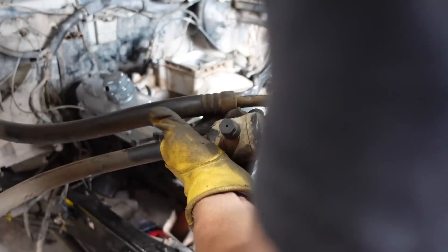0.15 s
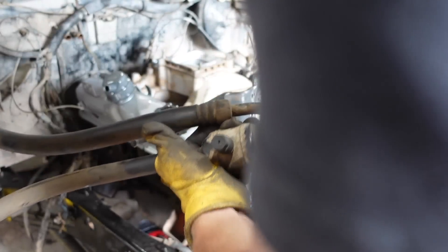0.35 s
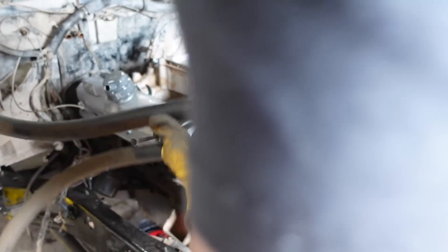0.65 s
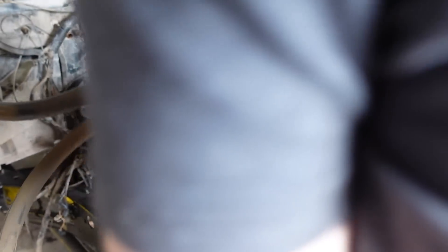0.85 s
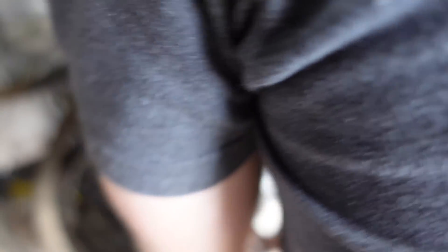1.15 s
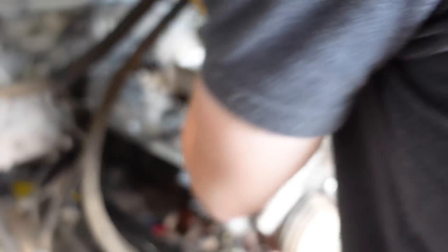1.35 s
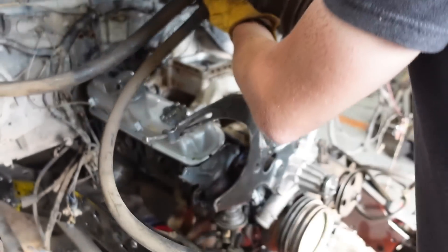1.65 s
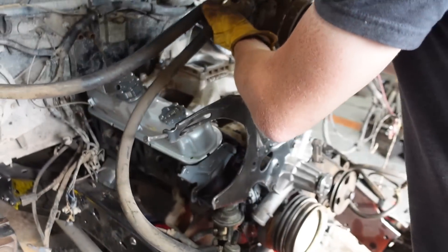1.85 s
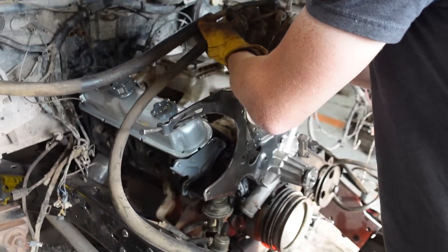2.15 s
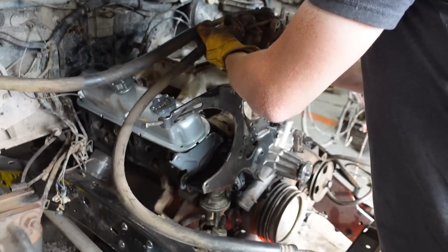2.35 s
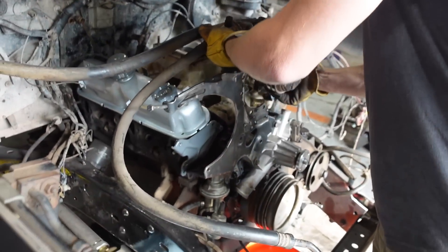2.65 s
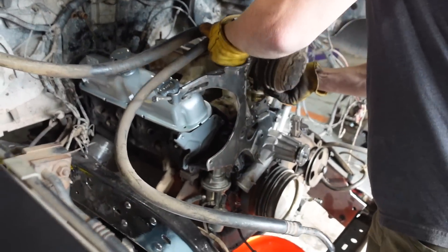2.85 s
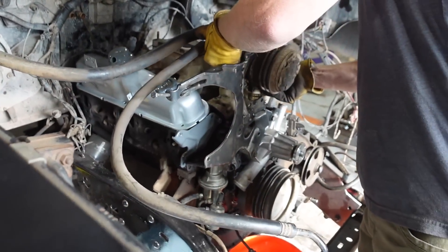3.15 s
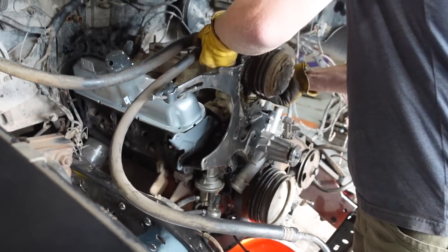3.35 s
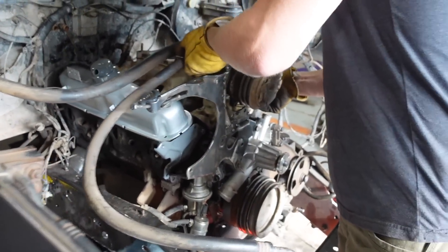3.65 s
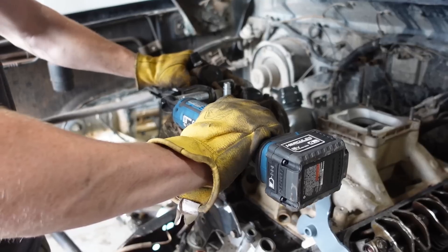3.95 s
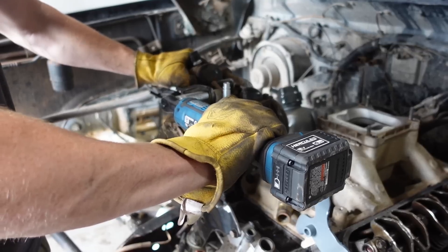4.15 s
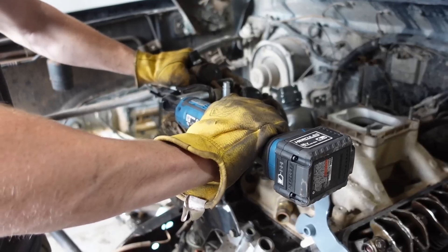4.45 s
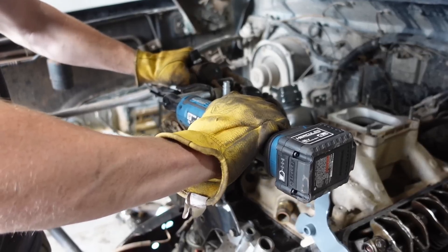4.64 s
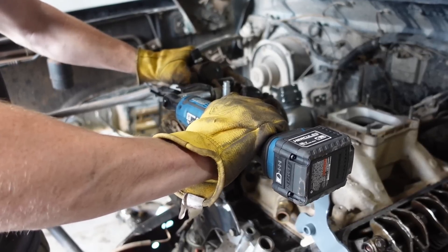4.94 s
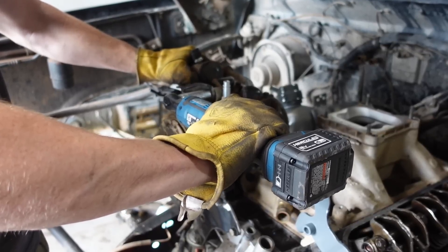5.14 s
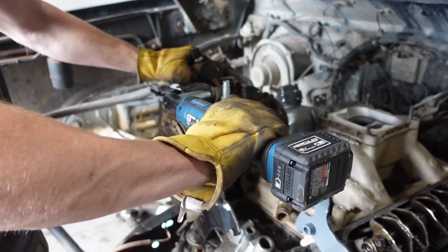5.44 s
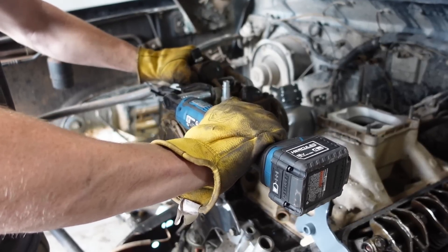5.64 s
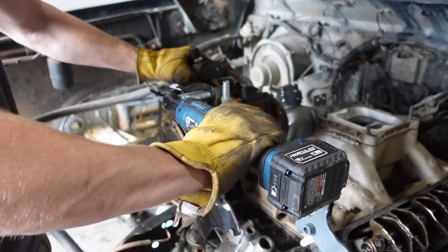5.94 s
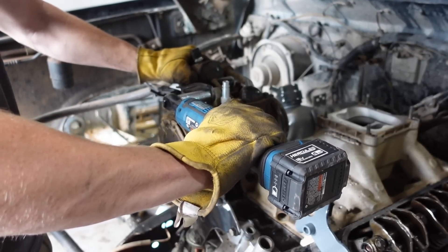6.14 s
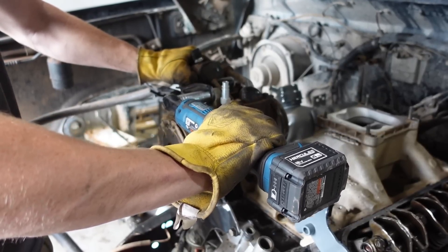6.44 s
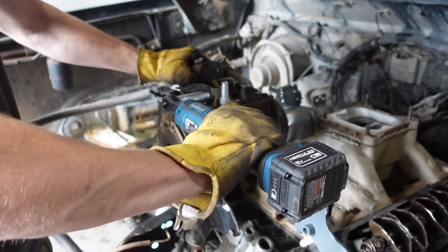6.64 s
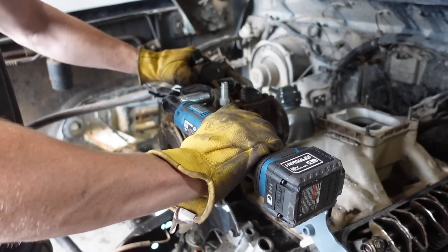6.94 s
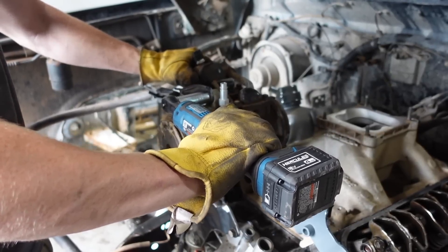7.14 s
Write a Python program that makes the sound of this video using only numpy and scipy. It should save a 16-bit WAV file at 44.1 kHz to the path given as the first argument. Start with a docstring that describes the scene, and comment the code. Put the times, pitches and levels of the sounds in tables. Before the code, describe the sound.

In a workshop, heard close, steel slides briefly and a hollow part knocks over a low rumble. Gloves and sleeves rustle, small metal pieces clink, then a heavy part bangs home and chatters. After quieter handling, a cordless ratchet blips, whines and runs a bolt in with rapid clattering clicks, harder in uneven grips, ending with a short squeak as the bolt seats.

```python
"""A low rumble, a sliding steel part and rustling gloves open work on an engine in a workshop.
Parts knock, bump, clink and squeak as decaying or friction-driven resonances; one bangs home and chatters.
A cordless ratchet is blipped, then runs a bolt in: each swing of its yoke gives a knock and three pawl clicks.
When the bolt grips, knocks harden and clacks ring the socket; the bolt squeaks as it seats.
The speed controller whines as a two-harmonic tone, and diffuse reflections give the room's answer."""
import sys
import numpy as np
from scipy import signal
from scipy.fft import rfft, irfft
from scipy.io import wavfile
from scipy.ndimage import uniform_filter1d, map_coordinates

SR = 44100
rng = np.random.default_rng(int(sys.argv[2]) if len(sys.argv) > 2 else 0)


def master(y):
    """Save y as 16-bit WAV."""
    cut = np.clip(np.atleast_2d(y).T, -1, 1)
    pcm = np.round(cut * 32767)  # scale
    wavfile.write(sys.argv[1], SR, pcm.astype(np.int16))


N = 321474
TIME = np.arange(N) / SR


def amp(db):
    """Decibel law: level to amplitude ratio."""
    return 10 ** (np.asarray(db) / 20)


def unit(x):
    """Normalisation of x to rms 1."""
    return x / np.sqrt(np.mean(x ** 2) + 1e-20)


def along(points, hz):
    """Interpolation of (f/Hz, value) points on a logarithmic frequency axis."""
    f, v = np.transpose(points)
    return np.interp(np.log(hz + 1), np.log(f + 1), v)


def curves(rows, at=TIME):
    """Linear interpolation in time of each column of a curve table."""
    s, *columns = np.transpose(rows)
    return [np.interp(at, s, column) for column in columns]


def fade(t60, t=TIME[:SR]):
    """Exponential decay: the amplitude falls by 60 dB in t60 seconds."""
    return np.exp(-np.log(1000) * t / t60)


def swell(s, half):
    """Gaussian rise and fall round time s."""
    return np.exp(-np.minimum(((TIME - s) / half) ** 2, 20))


def add(track, s, sound):
    """Superposition of a sound on the track from time s."""
    part = track[max(round(s * SR), 0):][:len(sound)]
    part += sound[:len(part)]


def convolve(x, response):
    """Linear filtering: x convolved with an impulse response."""
    return signal.oaconvolve(x.astype(np.float32), response.astype(np.float32))[:len(x)].astype(float)


def colour(x, spectrum, size=8192):
    """Minimum-phase filtering to a spectral shape; white noise keeps its power."""
    shape = amp(along(spectrum, np.fft.rfftfreq(size, 1 / SR)))
    cepstrum = irfft(np.log(shape + 1e-6))
    # folding the cepstrum forward makes the response causal
    cepstrum[1:size // 2] *= 2
    cepstrum[size // 2 + 1:] = 0
    response = irfft(np.exp(rfft(cepstrum)))
    return convolve(x, response / np.linalg.norm(response))


def highpass(x, hz):
    """Second-order high-pass filtering: weak radiation at low frequencies."""
    return signal.lfilter(*signal.butter(2, hz, "highpass", fs=SR), x)


def resonate(x, modes):
    """Modal superposition: x through parallel (f/Hz, width/Hz, level/dB) resonances."""
    return sum(amp(db) * signal.lfilter(*signal.iirpeak(hz, hz / width, SR), x) for hz, width, db in modes)


def noise(spectrum):
    """Broadband random excitation, coloured and brought to rms 1."""
    return unit(colour(rng.standard_normal(N), spectrum))


def wobble(rate):
    """Smooth random modulation: spline through rate random knots a second."""
    knots = rng.standard_normal(int(N * rate / SR) + 4)
    steps = np.arange(len(knots) * 10) / 10
    return np.interp(TIME * rate, steps, map_coordinates(knots, [steps]))


SPIKE = 2.05  # the first touch of a contact, against the micro-impacts that follow it


def contacts(times, levels_db, t60, alike, size=2048):
    """Impact excitation: a sharp touch, then decaying micro-impacts correlated from one contact to the next."""
    burst, decay, track = rng.standard_normal(size), fade(t60)[:size], np.zeros(N)
    for s, db in zip(times, levels_db):
        fresh = rng.standard_normal(size)
        burst = alike * burst + np.sqrt(1 - alike ** 2) * fresh
        add(track, s, amp(db) * np.append(SPIKE, burst * decay))
    return track


def echo(x, decays):
    """Diffuse reverberation: each frequency of a noise tail dies at its own rate."""
    hz, t, z = signal.stft(rng.standard_normal(SR), SR, nperseg=128)
    decay = np.exp(-np.log(1000) * t / along(decays, hz)[:, None])
    tail = signal.istft(z * decay, SR, nperseg=128)[1]
    return convolve(x, np.pad(tail, (60, 0)) / np.linalg.norm(tail))


# course of the low rumble: t/s, level/dB
RUMBLE_LEVEL = [(0, -39), (.2, -27), (.62, -22.5), (1.55, -33), (2.85, -30.5), (3.9, -36), (4.2, -43),
                (7.29, -62)]
# spectral density of the rumble: f/Hz, relative level/dB per Hz
RUMBLE_COLOUR = [(8, -11.5), (18, 6), (34, -3), (52, -6), (81, -26), (160, -30), (400, -63)]
# spectral density of the workshop air: f/Hz, relative level/dB per Hz
AIR_COLOUR = [(150, -4), (500, -27), (2000, -33), (8000, -19), (16000, -40)]


def background():
    """Stationary noise: a low rumble of changing level over the steady air of the workshop."""
    return amp(curves(RUMBLE_LEVEL)[0]) * noise(RUMBLE_COLOUR) + amp(-74) * noise(AIR_COLOUR)


# a steel part slides: t/s, level/dB
SLIDE_LEVEL = [(0, -38), (.03, -33.5), (.11, -42), (.15, -47), (.29, -42), (.33, -62), (.4, -100)]
# resonances of the sliding part: f/Hz, width/Hz, relative level/dB
SLIDING_STEEL = [(667, 140, 4), (1680, 150, 5.5), (2100, 46, 0), (3340, 370, -5.5), (3720, 100, -9)]
# parts squeak when pushed, the bolt as it seats: middle t/s, half length/s, level/dB, f/Hz, width/Hz
SQUEAKS = [(0.631, 0.023, -39, 1210, 220), (2.996, 0.045, -41.5, 2060, 900), (3.515, 0.11, -54, 2250, 250),
           (6.996, .009, -22, 1770, 260), (7.024, .01, -20.5, 1550, 260)]


def scrape():
    """Friction excitation: uneven rubbing keeps sliding steel ringing and narrow squeaks sounding."""
    friction = rng.standard_normal(N) * amp(1.8 * wobble(150))
    track = amp(curves(SLIDE_LEVEL)[0]) * unit(resonate(friction, SLIDING_STEEL))
    for s, half, db, hz, width in SQUEAKS:
        track += amp(db) * swell(s, half) * unit(resonate(friction, [(hz, width, 0)]))
    return track


# faint rustle between rubs: t/s, relative glove scuff level/dB, relative sleeve level/dB
STIR = [(0, -39.5, -43), (.4, -44, -57), (1.65, -50.5, -56), (2.3, -59, -68.5), (2.65, -52.5, -53),
        (3.12, -50.5, -55.5), (3.32, -53.5, -64.5), (3.45, -49, -55.5), (3.95, -43, -65)]
# rubs: middle t/s, half length/s, relative glove scuff level/dB, relative sleeve level/dB, resonance f/Hz
RUBS = [(0.452, 0.04, -38.5, -48.5, 2700), (0.61, 0.028, -39, -45.5, 8000),
        (0.864, 0.018, -42, -52.5, 1150), (0.997, 0.079, -38.5, -46, 2600),
        (1.118, 0.052, -39.5, -53.5, 9000), (1.377, 0.034, -41.5, -49.5, 3000),
        (1.481, 0.036, -39, -44.5, 6700), (2.906, 0.11, -46.5, -51, 3400),
        (3.228, 0.02, -46.5, -47.5, 9000), (3.405, 0.021, -49.5, -53, 11900),
        (3.7, 0.12, -66, -52.5, 12500)]
# spectral density of glove friction: f/Hz, relative level/dB per Hz
GLOVE_COLOUR = [(100, 1), (400, -4.5), (1200, -8.5), (2400, -17.5), (6000, -52)]
# spectral density of sleeve friction: f/Hz, relative level/dB per Hz
SLEEVE_COLOUR = [(1200, -9), (2600, 0.5), (6700, -4.5), (12800, -13), (16000, -34)]
RUB_RING_DB, RUB_RING_SHARE = -5, .4  # ring level against the sleeve; its width as a share of its pitch


def rustle():
    """Granular friction noise: gloves scuff on hoses and sleeves brush by, each rub with its own resonance."""
    # powers, not amplitudes, add up
    scuff, sleeve = amp(curves(STIR)) ** 2
    friction, rings = rng.standard_normal(N), np.zeros(N)
    for s, half, scuff_db, sleeve_db, hz in RUBS:
        rub = swell(s, half)
        scuff = scuff + amp(scuff_db) ** 2 * rub
        sleeve = sleeve + amp(sleeve_db) ** 2 * rub
        ring = unit(resonate(friction, [(hz, RUB_RING_SHARE * hz, 0)]))
        rings += amp(sleeve_db + RUB_RING_DB) * np.sqrt(rub) * ring
    grain = wobble(70)
    glove_grain = amp(-0.57 + 0.95 * grain + 1.2 * wobble(300))
    sleeve_grain = amp(grain + 1.2 * wobble(500) - 2.04)
    glove = np.sqrt(scuff) * glove_grain * noise(GLOVE_COLOUR)
    return glove + sleeve_grain * (np.sqrt(sleeve) * noise(SLEEVE_COLOUR) + rings)


# modes of a hollow part that is knocked: f/Hz, relative level/dB, t60/s
HOLLOW_MODES = [(222.5, 0, 0.47), (346, -11.5, 0.16), (555, -15, 0.28), (741, -17, 0.25)]
# spectral density of a dull tap, here and under the clinks: f/Hz, relative level/dB per Hz
DULL_COLOUR = [(100, -30), (350, 5), (1500, 7), (3000, -6.5), (6000, -26)]


def hollow_knock(s=.126):
    """Modal decay: a bumped hollow part hums in damped sinusoids with a thud and a tap."""
    track, t = np.zeros(N), TIME[:SR]
    ring = sum(amp(db) * fade(t60) * np.sin(2 * np.pi * hz * t) for hz, db, t60 in HOLLOW_MODES)
    thud_colour = [(60, 3), (250, 5.0), (700, -14.0), (1400, -17.0), (4500, -52)]
    thud = colour(rng.standard_normal(SR) * fade(0.48), thud_colour)
    tap = colour(rng.standard_normal(SR) * fade(.03), DULL_COLOUR)
    add(track, s, amp(-14.0) * ring + amp(-22.0) * thud + amp(-27.5) * tap)
    return track


# soft bumps: t/s, relative level/dB, f/Hz, t60/s
BUMPS = [(0.499, -11.5, 25.7, 0.7), (1.097, -34, 390, 0.075), (1.104, -15.5, 118, 0.13),
         (1.351, -24.5, 226, 0.056), (2.865, -3.5, 27.2, 0.29), (2.882, -31.5, 342, 0.08),
         (3.509, -34, 590, 0.096), (3.773, -36, 759, 0.28)]


def bumps():
    """Heavy damping: each soft bump is a slow-onset decay of tone and noise round one pitch."""
    track, t = np.zeros(N), TIME[:SR]
    for s, db, hz, t60 in BUMPS:
        mode = [(hz, hz / 2, 0)]
        grit = unit(resonate(resonate(rng.standard_normal(SR), mode), mode))
        envelope = fade(t60) * (1 - fade(0.014))
        add(track, s, amp(db) * envelope * (np.sin(2 * np.pi * hz * t) + 0.85 * grit))
    return track


# metal touching metal: t/s, relative level/dB, dull part against the bright/dB
CLINKS = [(0.558, -35.5, -8), (0.5734, -28.5, 5.5), (1.325, -28.5, -14), (2.2013, -40.5, -22),
          (2.607, -37, -23), (2.684, -38.5, -20), (2.882, -40, 2), (3.51, -47.5, 9), (3.837, -23.5, -6),
          (3.8751, -25, 0.5), (3.884, -39.5, 15)]
# spectral density of a bright tick: f/Hz, relative level/dB per Hz
BRIGHT_COLOUR = [(400, -16), (4200, 0.5), (4700, 2.5), (5400, -5.5), (8000, -4), (16000, -33)]


def clinks(t60=0.068):
    """Impact noise: light steel contacts as decaying bursts, a bright tick over a duller knock."""
    bright, dull = np.zeros((2, N))
    for s, db, dull_db in CLINKS:
        add(bright, s, amp(db - 5.5) * fade(t60) * rng.standard_normal(SR))
        add(dull, s, amp(db + dull_db - 2.0) * fade(t60) * rng.standard_normal(SR))
    return colour(bright, BRIGHT_COLOUR) + colour(dull, DULL_COLOUR)


# spectral density of the bang's contacts: f/Hz, relative level/dB per Hz
BANG_COLOUR = [(150, 0.5), (320, -2), (750, -12.5), (1450, -2.5), (2100, -2.5), (2700, -10.5), (5800, -22),
               (8000, -23.5), (15000, -45)]
# modes of the part that bangs: f/Hz, relative level/dB
PLATE_MODES = [(300, -2.5), (355, 2), (450, -1), (1440, -2), (1750, 1), (1900, 1.5), (2090, 1.5)]
PLATE_WIDTH_HZ = 48  # how narrowly each mode rings
BANG_LOW_HZ = 250  # the falling part radiates little below this


def bang(s=1.7413, chatter_s=0.068):
    """Impact and modal response: a heavy part drops home with a push, then chatters and rings its modes."""
    track, t = np.zeros(N), TIME[:SR]
    u = t / 0.0016
    push = (1 - u) * np.exp(-u) * (1 - fade(0.0012)) ** 2
    hit = amp(-10.5) * fade(0.01)
    chatter = amp(-18.5) * np.exp(-(t / chatter_s) ** 2) * amp(wobble(400)[:SR])
    blows = colour((hit + chatter) * rng.standard_normal(SR), BANG_COLOUR)
    ring = resonate(blows, [(hz, PLATE_WIDTH_HZ, db) for hz, db in PLATE_MODES])
    add(track, s, amp(8.0) * push + blows + amp(3) * ring)
    return highpass(track, BANG_LOW_HZ)


# thin ticks of small parts: t/s, relative level/dB
TICKS = [(2.591, -46), (3.188, -51), (3.773, -34)]


def ticks(hz=12400, width=1800, t60=.13):
    """High-frequency resonance: touches of small parts sizzle in one broad, very high mode."""
    track = np.zeros(N)
    for s, db in TICKS:
        add(track, s, amp(db) * fade(t60) * rng.standard_normal(SR))
    return amp(7) * resonate(track, [(hz, width, 0)])


def fidget(start=2.72, end=2.84, level_db=-45, count=10):
    """Random impact train: fingers work a part into place with tiny, dry clicks."""
    times, levels_db = rng.uniform(start, end, count), rng.normal(level_db, 2, count)
    return colour(contacts(times, levels_db, t60=0.017, alike=0), BRIGHT_COLOUR)


# course of the motor's gear noise: t/s, relative level/dB
GEAR_LEVEL = [(3.768, -72), (3.773, -35.5), (3.84, -47), (3.98, -52.5), (4.02, -41), (4.06, -26),
              (7.29, -24.5)]
# spectral density of the gear noise: f/Hz, relative level/dB per Hz
GEAR_COLOUR = [(150, -32.5), (400, -4.5), (1500, 2.5), (3000, -3), (9000, -16), (12500, -13), (16000, -26)]


def gear_noise():
    """Modulated broadband noise: the motor's gears mesh with a fast, uneven flutter."""
    return amp(curves(GEAR_LEVEL)[0] + 4.6 * wobble(400) - 1.1) * noise(GEAR_COLOUR)


# spells in which the whine is heard: start t/s, end t/s
WHINE_SPELLS = [(3.772, 3.833), (3.983, 6.1)]
WHINE_DB, WHINE_DB_PER_S = -36, 1  # the whine starts here and grows slowly


def whine(switch_hz=4997):
    """Forced vibration: the speed controller's switching makes the motor windings sing with a second harmonic."""
    sounding = sum(1.0 * (TIME > start) * (TIME < end) for start, end in WHINE_SPELLS)
    phase = 2 * np.pi * switch_hz * TIME
    tone = np.sin(phase) + amp(-18.5) * np.sin(2 * phase)
    level_db = WHINE_DB + WHINE_DB_PER_S * (TIME - WHINE_SPELLS[0][0]) + 1.8 * wobble(68)
    return uniform_filter1d(sounding, size=90) * amp(level_db) * unit(tone)


# yoke speed: t/s, strokes per second f/Hz
YOKE_SPEED = [(4.106, 32.01), (4.196, 37.96), (4.398, 26.52), (4.476, 34.33), (4.796, 39.43),
              (4.927, 38.86), (4.976, 28.16), (4.994, 36.57), (5.217, 37.6), (5.4, 33.1), (5.622, 39.3),
              (5.754, 35.25), (6.136, 39.49), (6.223, 37.64), (6.306, 40.63), (6.538, 41.44),
              (6.603, 38.95), (6.694, 40.37), (6.947, 40.53), (7.021, 35.77), (7.29, 32.01)]


def stroke_times(phase, scatter):
    """Phase accumulation: the moments at which the yoke passes this share of its swing, with scatter/s."""
    running = TIME[TIME >= YOKE_SPEED[0][0]]
    turns = np.cumsum(curves(YOKE_SPEED, running)[0]) / SR
    times = np.interp(np.arange(int(turns[-1]) + 1) + phase, turns, running)
    return times + scatter * rng.standard_normal(len(times))


# spells in which the bolt resists and the yoke bites hard: start t/s, length/s, grip level/dB
GRIPS = [(4.1, 0.22, 4.5), (4.58, 0.28, 6.5), (5, 0.21, 9), (5.417, 0.013, 11), (5.491, .07, 5.5),
         (5.604, 0.14, 6.5), (5.79, 0.303, 7.5), (6.383, 0.16, 3), (6.739, 0.11, 7)]
GRIP_ATTACK_S, GRIP_RELEASE_S = 0.017, 0.033


def grip(at):
    """Resisting torque as a level in dB: attack, hold and release of each spell."""
    total_db = 0
    for s, length, db in GRIPS:
        corners = [s - GRIP_ATTACK_S, s, s + length, s + length + GRIP_RELEASE_S]
        total_db = total_db + db * np.interp(at, corners, [0, 1, 1, 0])
    return total_db


FREE_LOAD_DB = -23.5  # load on the yoke while the bolt turns freely, at the start of the run
LOAD_SHARE, LOAD_DB_PER_S = 0.54, -0.52  # share of a grip that reaches the bracket; easing over the run


def load(at):
    """Transmitted load in dB: it rises with each grip and eases over the run."""
    return FREE_LOAD_DB + LOAD_SHARE * grip(at) + LOAD_DB_PER_S * (at - YOKE_SPEED[0][0])


# how hard the pawl snaps: t/s, relative level/dB
PAWL_LEVEL = [(4.1, -23.5), (4.35, -29.5), (4.55, -25), (4.9, -27), (5.05, -28.5), (5.3, -28.5), (5.8, -30),
              (7.29, -32.5)]


def pawl_click(phase, gain_db, t60, grip_share):
    """Periodic impact: the pawl drops over a tooth once a swing, its level altered by a share of the grip."""
    times = stroke_times(phase, scatter=.0003)
    level_db = curves(PAWL_LEVEL, times)[0] + gain_db + grip_share * grip(times)
    return contacts(times, level_db + rng.normal(0, 2.1, len(times)), t60, alike=0.47)


# the pawl's first snaps as the motor starts: t/s, relative level/dB
CATCHES = [(4.056, -3.5), (4.076, -8), (4.094, -4)]
# spectral density of the first click: f/Hz, relative level/dB per Hz
CLICK_COLOUR = [(1000, -25), (2500, -10), (4300, 6), (6000, 2), (8000, 4), (10000, 4), (12500, -13),
                (16000, -19)]
# spectral density of the catches and later clicks: f/Hz, relative level/dB per Hz
SNAP_COLOUR = [(300, -19.5), (2500, -6), (5000, 9), (7700, 6.5), (10500, 3), (12500, 11.5), (13600, -1.5),
               (16000, -10.5)]


def pawl():
    """Impact train: three clicks a swing; a grip strengthens the first a little and weakens the third."""
    first = pawl_click(phase=.46, gain_db=14, t60=0.0086, grip_share=0.17)
    second = pawl_click(phase=.62, gain_db=20, t60=0.0075, grip_share=0)
    third = pawl_click(phase=0.8, gain_db=13, t60=0.026, grip_share=-1.1)
    catches = contacts(*np.transpose(CATCHES), t60=0.0072, alike=0.92)
    return colour(first, CLICK_COLOUR) + colour(second + third + catches, SNAP_COLOUR)


# strength of the harmonics of the housing: f/Hz, relative level/dB of each harmonic
GROWL_COLOUR = [(75, -20), (110, -35), (170, -8), (245, -18.5), (350, -4), (500, -8), (900, -9)]


def growl(count=22):
    """Harmonic synthesis: the housing rocks with every stroke, so low harmonics follow the yoke's speed."""
    running = TIME[TIME >= YOKE_SPEED[0][0]]
    speed = curves(YOKE_SPEED, running)[0]
    turns = np.cumsum(speed) / SR
    hum = np.zeros(len(running))
    for k in range(2, count + 1):
        # the harmonics are only loosely in step
        phase = 2 * np.pi * k * (turns - .12) + rng.normal(0, 1.0)
        hum += amp(along(GROWL_COLOUR, k * speed)) * np.sin(phase)
    track = np.zeros(N)
    add(track, running[0], hum * amp(-40 + 0.48 * grip(running)))
    return track * amp(2.9 * wobble(7))


# spectral density of the yoke's contacts: f/Hz, relative level/dB per Hz
KNOCK_COLOUR = [(100, -38), (250, -21.5), (450, -6.5), (1100, 0), (2500, -1.5), (4200, -1), (6000, -4),
                (8000, -7.5), (12000, -18), (16000, -23)]
KNOCK_PHASE, REBOUND_PHASE = 0.03897, .22  # shares of a swing
FREE_KNOCK_DB, REBOUND_DB = -13.5, -7.5  # knock while the bolt turns freely; rebound against the knock
EDGE_DB, EDGE_HZ, DULL_SHARE = -12.5, 2300, 0.64  # bright edge; share of a grip in the dull body


def yoke():
    """Impact and rebound: each swing knocks the socket and shakes the bracket, harder and brighter in a grip."""
    times = stroke_times(KNOCK_PHASE, scatter=.0001)
    uneven_db = rng.normal(0, 0.95, len(times))
    eased_db = LOAD_DB_PER_S * (times - YOKE_SPEED[0][0])
    body_db = FREE_KNOCK_DB + DULL_SHARE * grip(times) + eased_db + uneven_db
    edge_db = EDGE_DB + grip(times) + rng.normal(0, 0.93, len(times))
    body = contacts(times, body_db, t60=0.0098, alike=0.71)
    rebound_times = stroke_times(REBOUND_PHASE, scatter=.0004)
    rebound = contacts(rebound_times, body_db + REBOUND_DB, t60=.012, alike=0.77)
    edge = highpass(contacts(times, edge_db, t60=0.0037, alike=0.34), EDGE_HZ)
    bracket = contacts(times, load(times) + uneven_db + 5.0, t60=0.062, alike=0.84)
    return colour(body + rebound + edge + bracket, KNOCK_COLOUR)


# the hardest bites of the yoke crack through the socket: t/s, relative level/dB
CLACKS = [(4.1652, -8), (4.2194, -2), (4.2473, -4), (4.6706, -6), (4.876, -6.9), (5.1247, 0), (5.1516, -12),
          (5.179, -12), (5.205, -5), (5.674, -9), (5.7845, -12), (5.8945, -9), (6.0018, -4), (6.0286, -1),
          (6.054, -8), (6.458, -2), (6.507, -9.5), (6.63, -1), (6.8045, -10)]
CLACK_HZ, CLACK_SPREAD, CLACK_T60_S = 3820, 0.18, 0.0045  # middle pitch, its log spread, decay


def clacks():
    """Damped free vibration: a hard bite rings the socket for a few cycles, each time at another pitch."""
    track, t = np.zeros(N), TIME[:SR]
    for s, db in CLACKS:
        hz = CLACK_HZ * np.exp(CLACK_SPREAD * rng.standard_normal())
        ring = np.sin(2 * np.pi * hz * t) + 0.34 * rng.standard_normal(SR)
        add(track, s, amp(db) * fade(CLACK_T60_S) * ring)
    return track


# resonances of head, socket and bracket: f/Hz, width/Hz, relative level/dB
HEAD_MODES = [(730, 73, -7), (913, 55, -3.5), (1317, 95, -2), (1625, 91, -5), (2140, 75, -1),
              (3180, 260, -1.5), (3590, 61, -2), (4206, 430, 3), (5200, 500, -2.5), (7700, 370, 1.5)]
# the nearest resonance flares as the socket shifts: middle t/s, half length/s, f/Hz, extra level/dB
FLARES = [(4.222, 0.13, 4280, 7), (6.004, 0.65, 3170, 5.5), (5.87, 0.1, 1595, 15), (6.95, 0.24, 2130, 8),
          (6.98, 0.21, 3570, 17), (7.05, 0.32, 1595, 12.5)]
SWELL_DB, WANDER_CYCLES = 2, 0.086  # size of each resonance's random swell and of its phase wander


def head(blows):
    """Time-varying modal response: resonances ring with every blow, swell, wander and flare."""
    pitches, track = np.transpose(HEAD_MODES)[0], np.zeros(N)
    gain_db = [SWELL_DB * wobble(12) for _ in HEAD_MODES]
    for s, half, hz, db in FLARES:
        gain_db[np.argmin(abs(pitches - hz))] += db * swell(s, half)
    for mode, db in zip(HEAD_MODES, gain_db):
        # reading the ring at wandering times bends its pitch
        wandering = TIME + WANDER_CYCLES * wobble(35) / mode[0]
        track += amp(db) * np.interp(wandering, TIME, resonate(blows, [mode]))
    return track


HEAD_LOW_HZ = 290  # the small steel head radiates little below this


def ratchet():
    """Source, resonator and scattering: blows ring the steel head and scatter, shifting, in the engine bay."""
    blows = yoke() + pawl() + gear_noise()
    steel = highpass(amp(-2.5) * blows + amp(-3.0) * head(blows) + clacks(), HEAD_LOW_HZ)
    bay = [(300, 0.054), (10000, 0.015)]  # f/Hz, t60/s
    # the hand's movement shifts the balance of two independent diffuse responses
    turn = wobble(3)
    scattered = np.cos(turn) * echo(steel, bay) + np.sin(turn) * echo(steel, bay)
    return growl() + steel + amp(-13.5) * scattered


# reverberation of the workshop: f/Hz, t60/s
ROOM_DECAY = [(150, 2.5), (400, 0.81), (800, 1), (1800, 0.63), (4000, 0.85), (12000, 0.22)]


def scene():
    """Direct and reverberant field: tool and parts sound close by, with the room behind them."""
    tool = ratchet()
    parts = scrape() + hollow_knock() + bumps() + clinks() + bang() + ticks() + fidget()
    room = echo(amp(-12.0) * tool + amp(-19.0) * parts, ROOM_DECAY)
    return (background() + rustle() + parts + tool + whine() + room)[None]


TOP_HZ = 16100  # nothing sounds above this


def record(dry):
    """Soft saturation and band limiting: high peaks are rounded and the spectrum ends at TOP_HZ."""
    held = dry / (1 + abs(dry) ** 6) ** (1 / 6)
    return irfft(rfft(held) * (np.fft.rfftfreq(N, 1 / SR) < TOP_HZ), N)


dry = scene()
out = record(dry)
master(out)
```